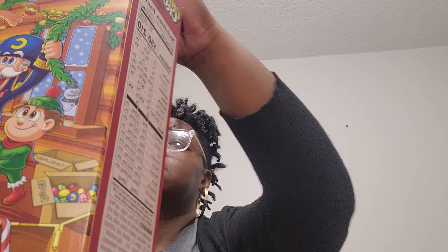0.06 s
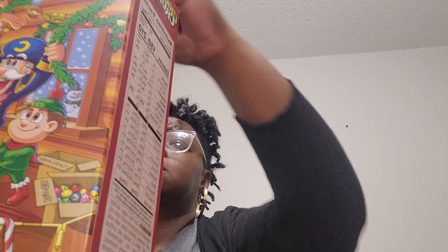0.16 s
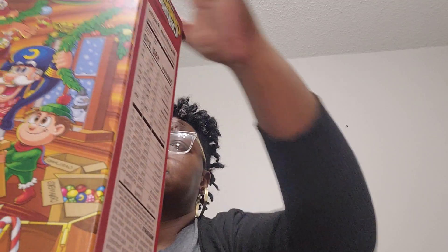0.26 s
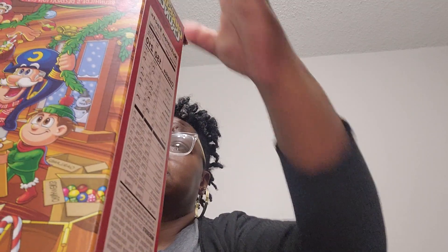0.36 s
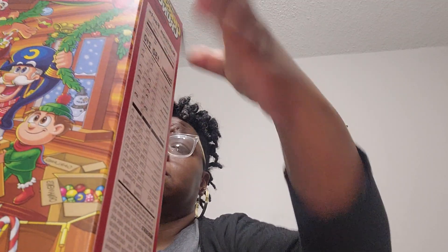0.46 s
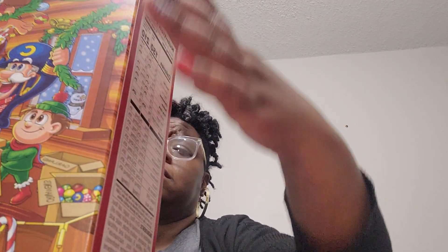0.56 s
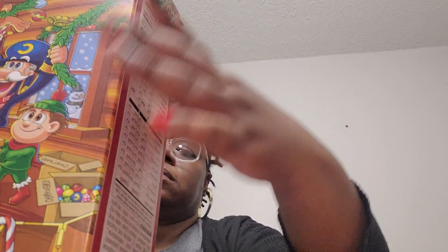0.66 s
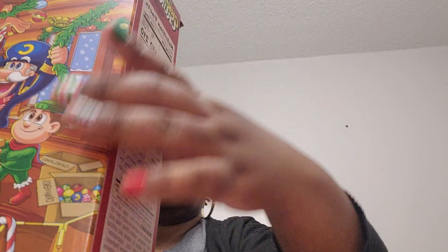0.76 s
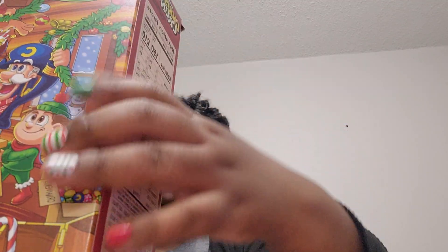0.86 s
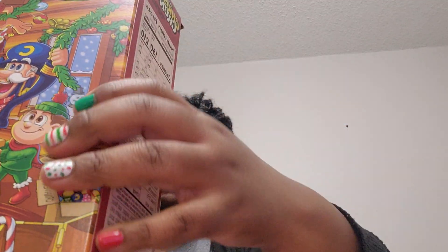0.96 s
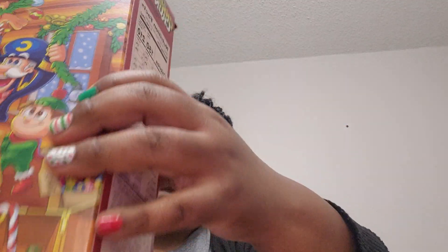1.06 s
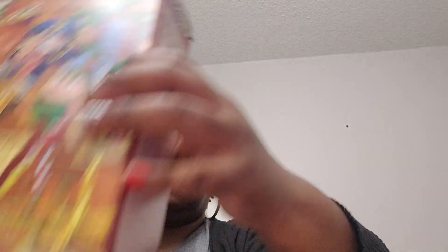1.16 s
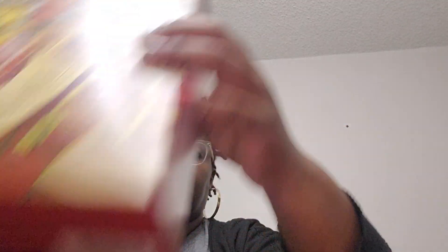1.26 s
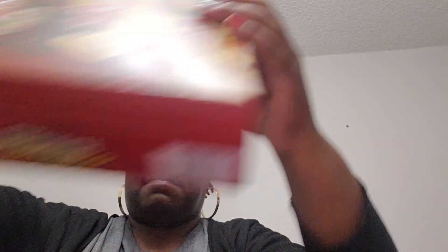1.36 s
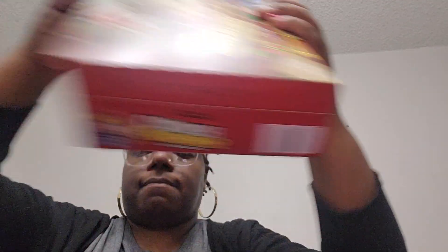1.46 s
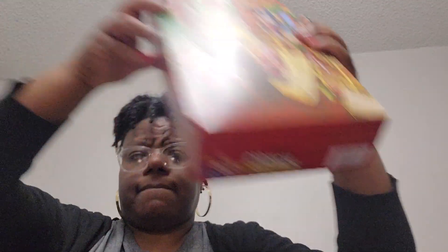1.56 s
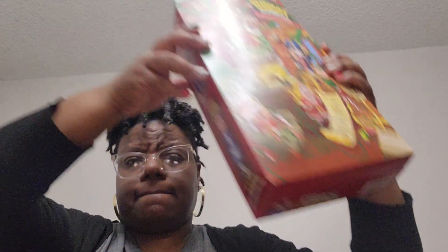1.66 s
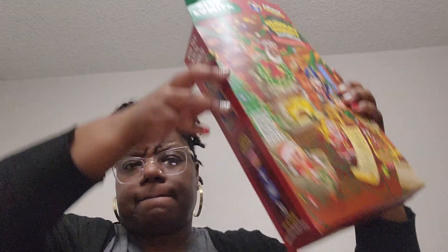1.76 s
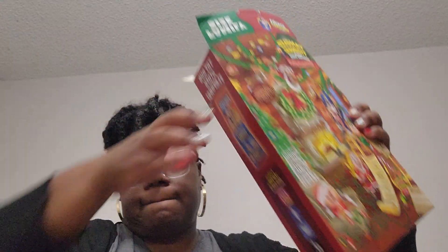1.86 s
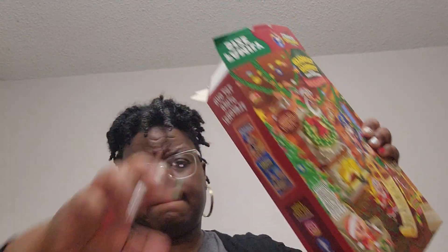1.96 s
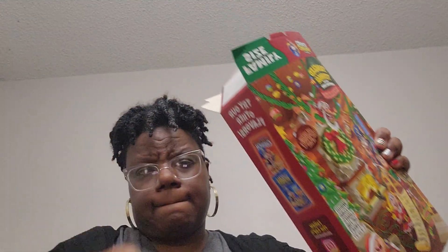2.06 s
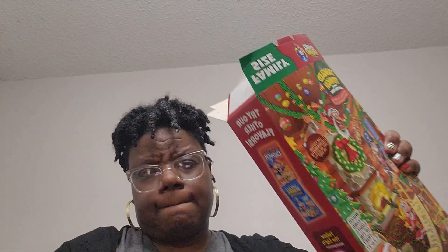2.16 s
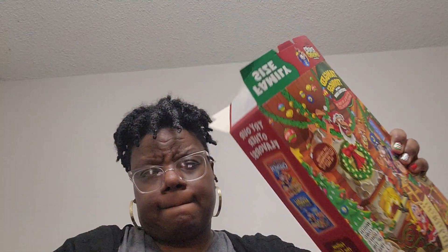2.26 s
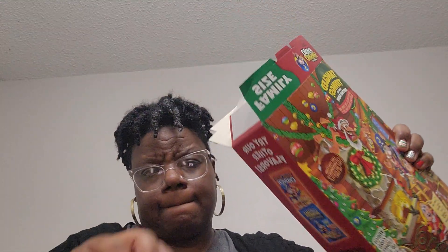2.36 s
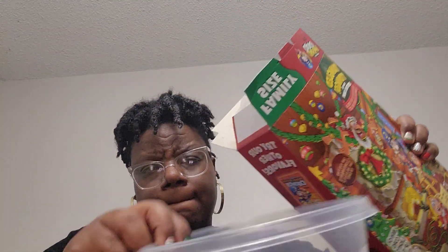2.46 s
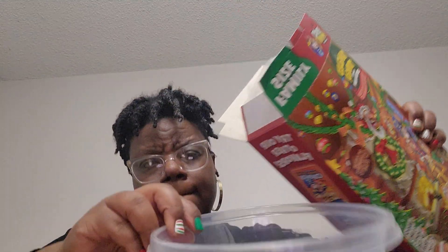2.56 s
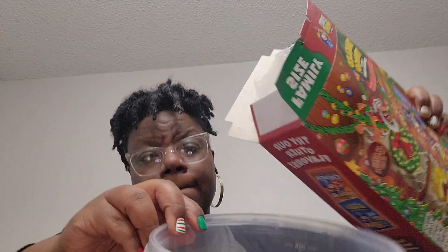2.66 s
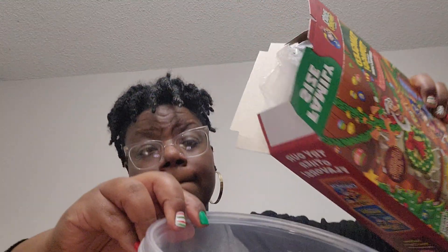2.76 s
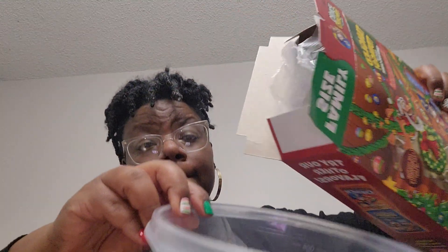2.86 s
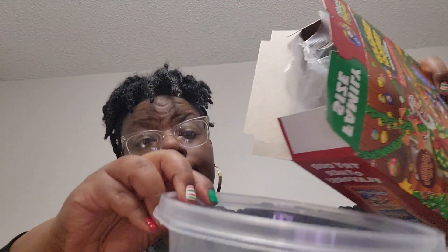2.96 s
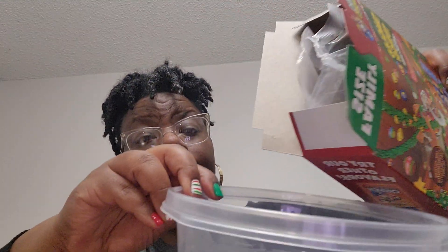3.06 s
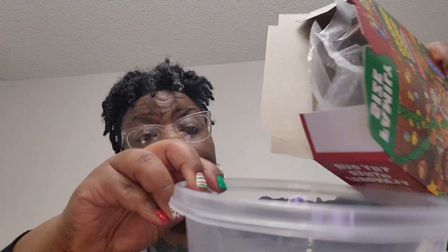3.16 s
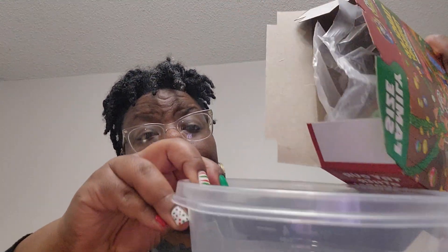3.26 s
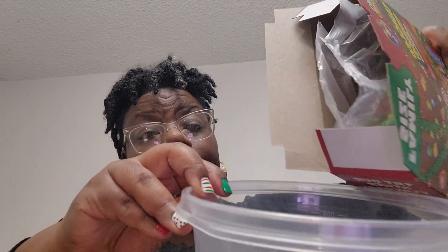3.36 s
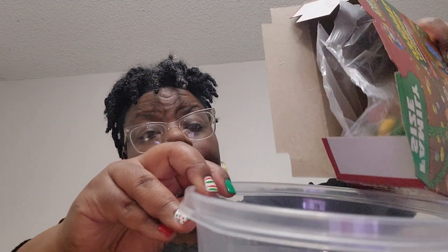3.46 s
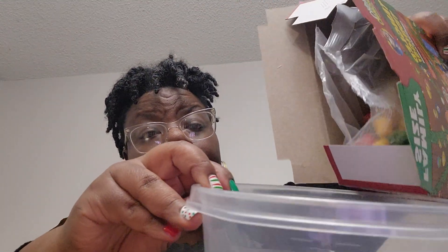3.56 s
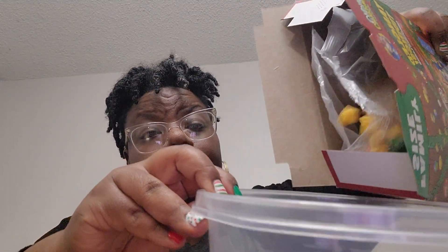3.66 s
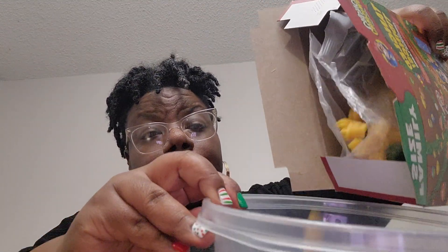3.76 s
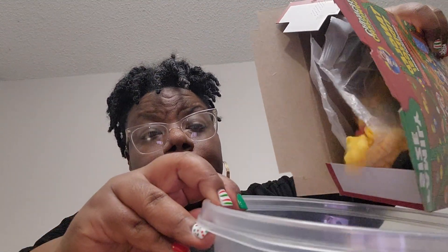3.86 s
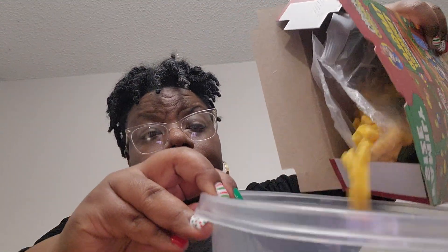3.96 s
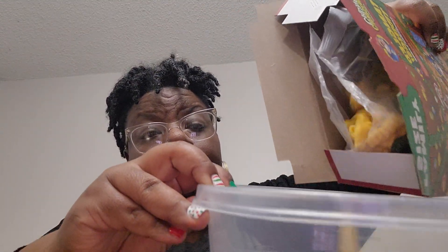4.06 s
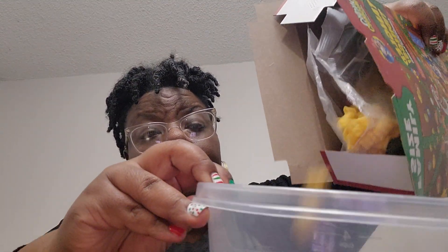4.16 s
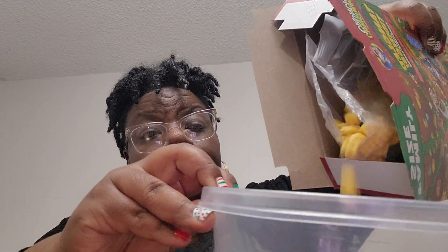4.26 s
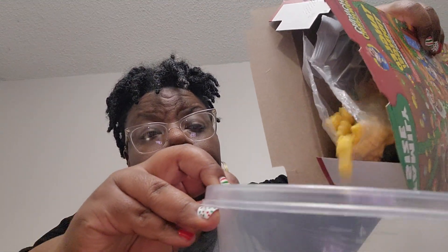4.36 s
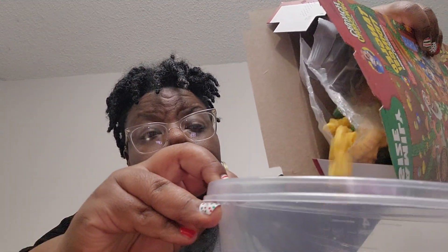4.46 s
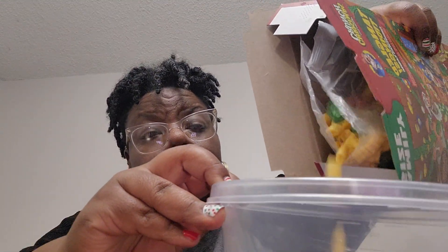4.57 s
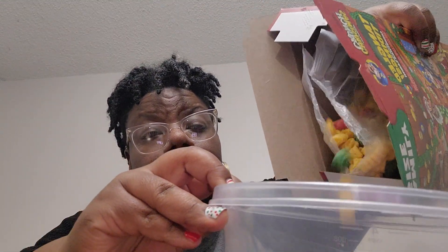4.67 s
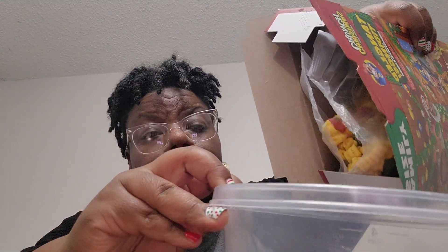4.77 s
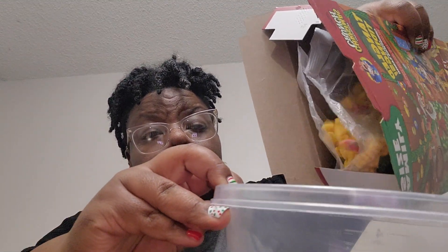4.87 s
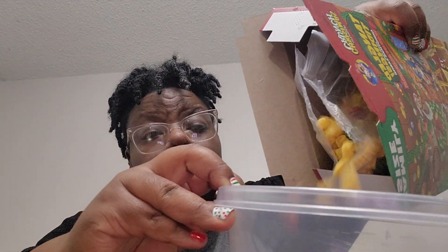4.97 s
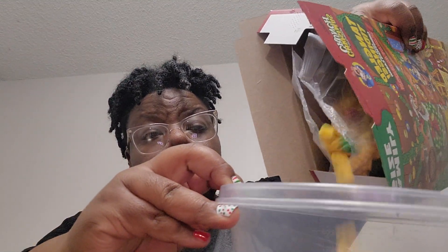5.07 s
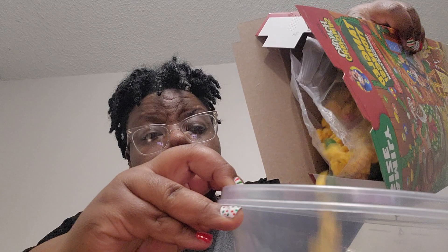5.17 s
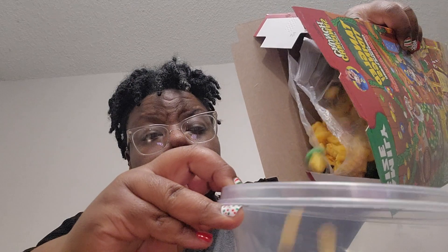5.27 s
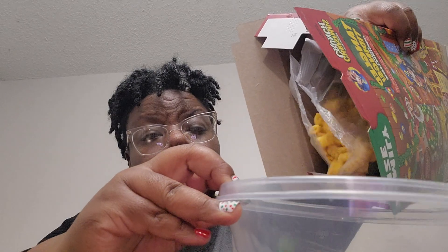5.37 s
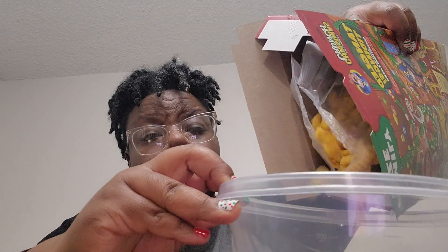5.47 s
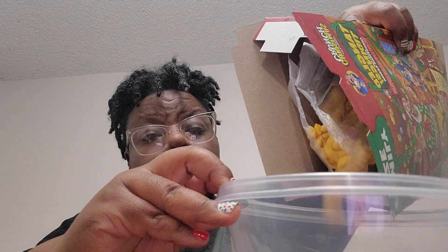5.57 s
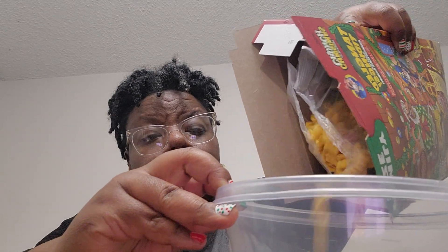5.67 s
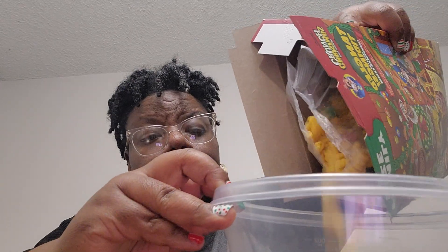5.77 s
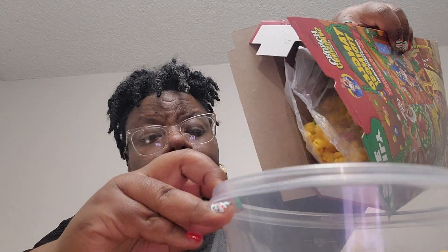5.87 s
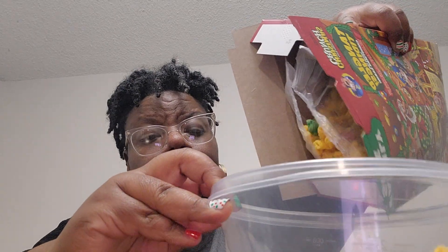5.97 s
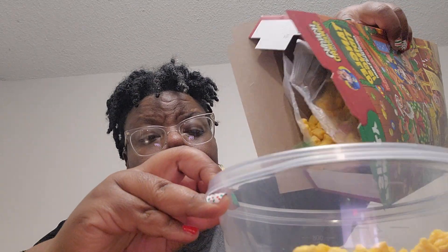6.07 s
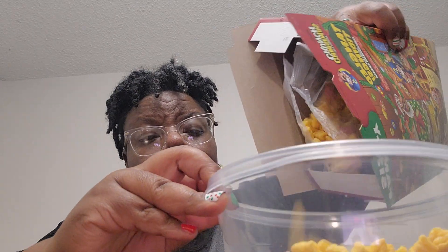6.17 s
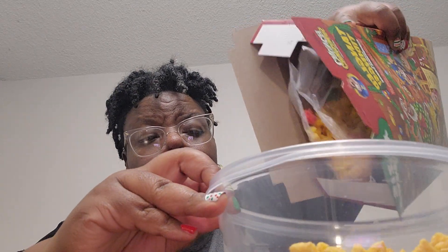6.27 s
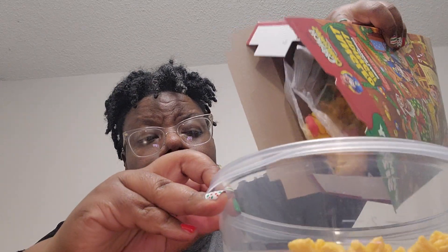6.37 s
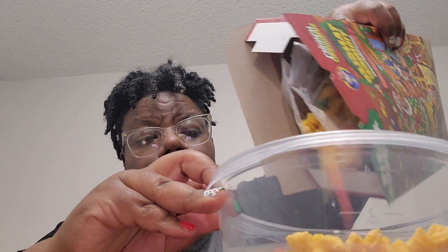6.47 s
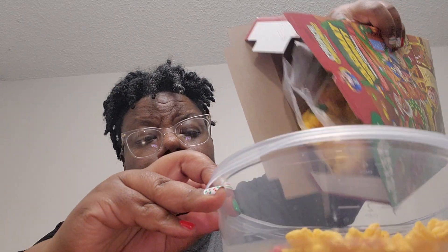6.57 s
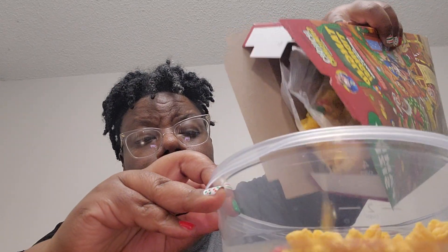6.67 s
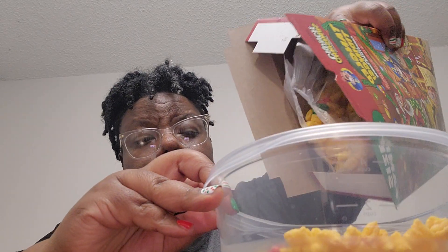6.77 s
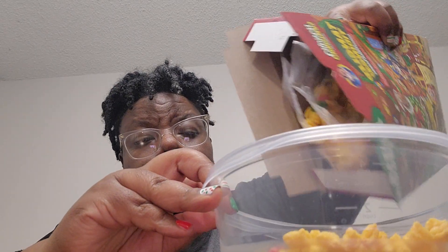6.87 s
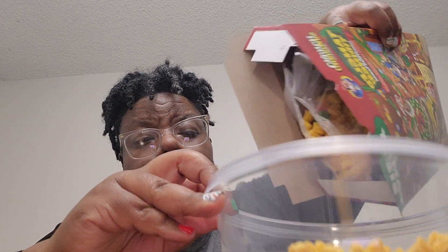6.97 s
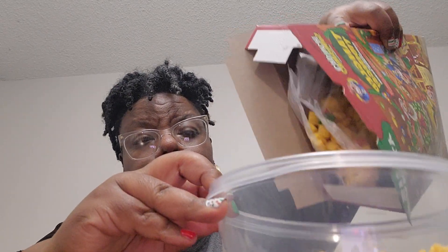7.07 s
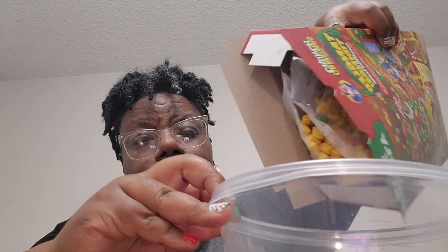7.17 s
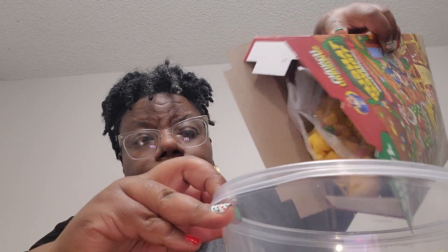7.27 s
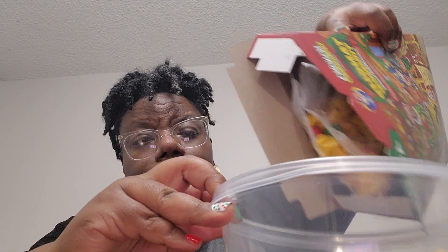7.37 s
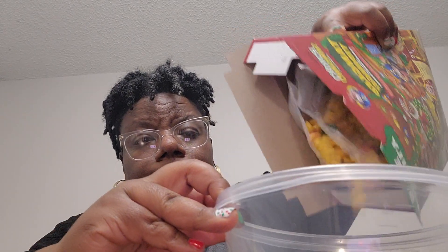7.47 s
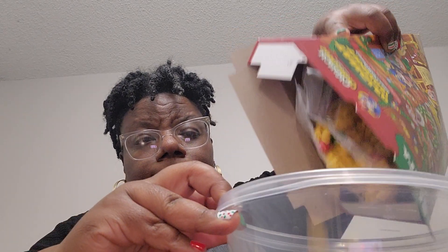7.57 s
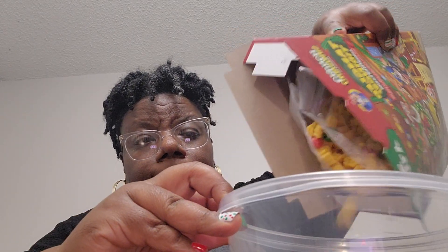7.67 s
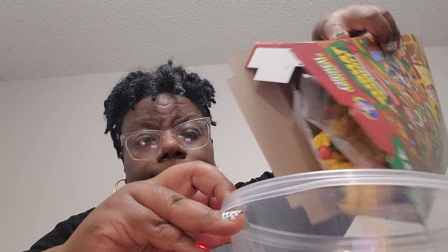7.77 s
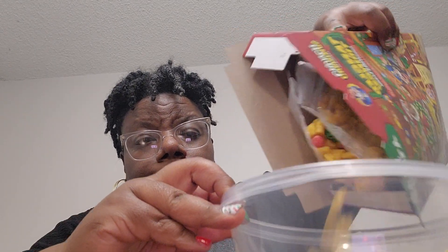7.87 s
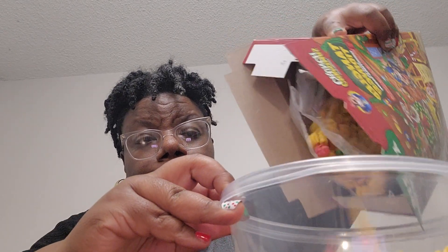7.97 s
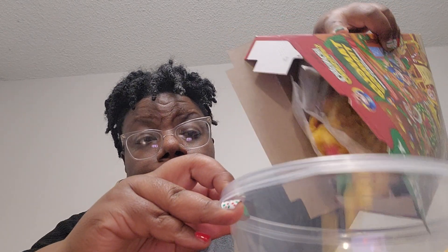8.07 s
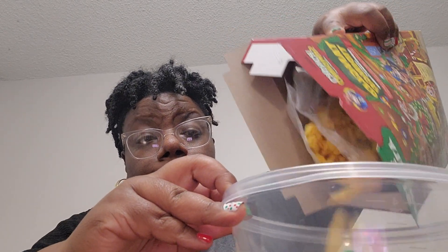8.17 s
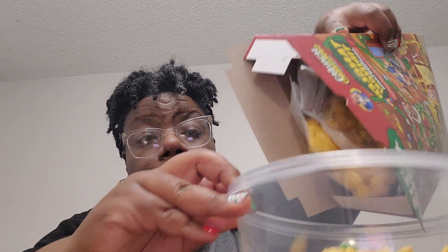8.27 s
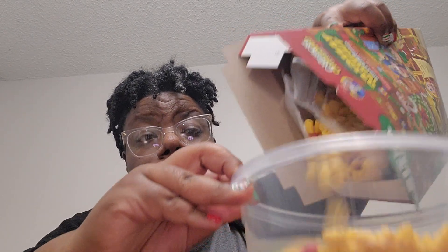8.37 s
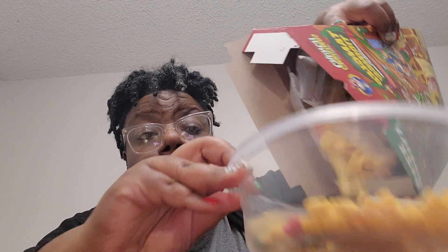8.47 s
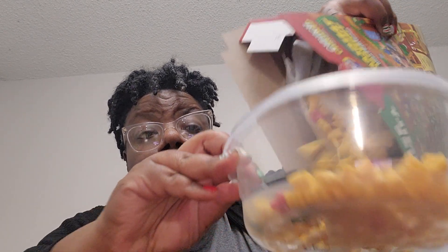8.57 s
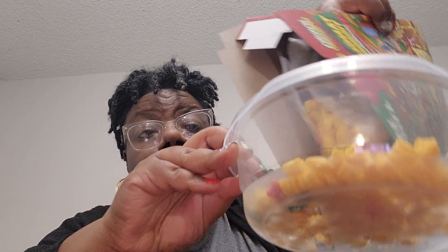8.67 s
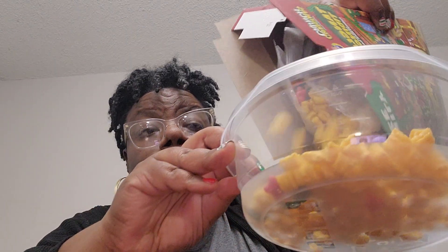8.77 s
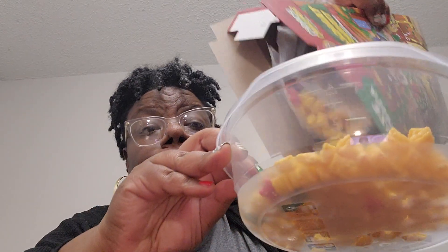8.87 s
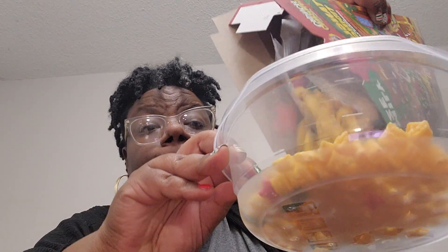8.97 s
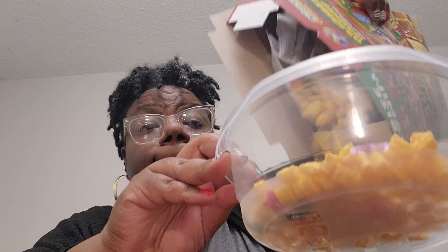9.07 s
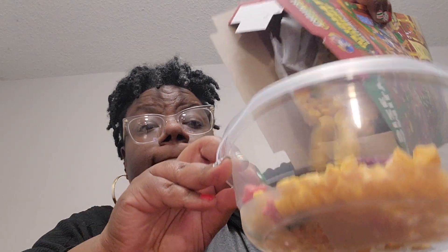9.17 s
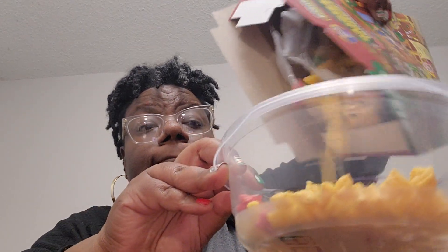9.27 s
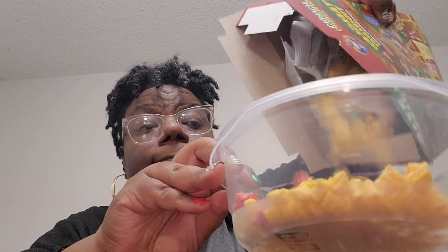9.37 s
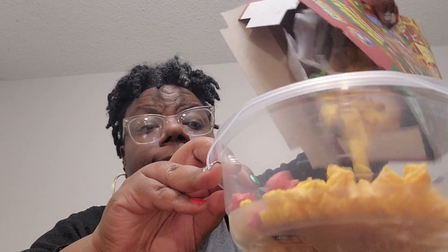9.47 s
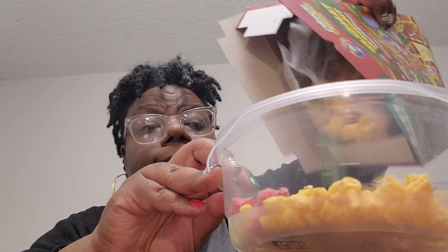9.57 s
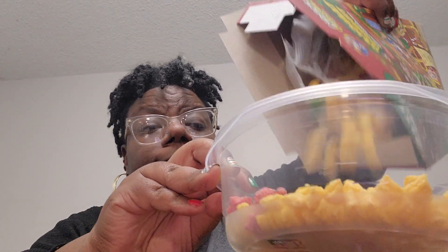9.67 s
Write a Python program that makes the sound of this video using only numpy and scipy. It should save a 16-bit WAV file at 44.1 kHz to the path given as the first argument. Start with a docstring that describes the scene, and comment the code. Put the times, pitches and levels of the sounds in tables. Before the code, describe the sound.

In a small quiet room, close to the microphone, hands rub and bump a cardboard cereal box while its plastic liner crinkles and cereal shifts inside. After about four seconds hard, light pieces rattle densely into a hollow plastic tub with sharp clacks and knocks. They thin to scattered hits with a couple of bright rim ticks, then a duller, softer stream tumbles onto the heap.

```python
"""A cardboard cereal box is picked up and tipped over a plastic tub in a small room. First hands bump and rub
the box (grainy noise and short rings) and its liner bag crinkles; then the cereal slides forward (soft noise).
From about 3.9 s hard pieces drop into the tub, each a knock, a clack and a crack with weaker repeats.
They thin out from about 6 s, and from about 7.6 s a duller stream runs on to the heap."""
import sys
import numpy as np
from scipy import signal
from scipy.fft import rfft, irfft, next_fast_len
from scipy.io import wavfile
from scipy.ndimage import map_coordinates

SR = 44100
rng = np.random.default_rng(int(sys.argv[2]) if len(sys.argv) > 2 else 0)


def wav_record(signal):
    """Record a signal, one row per channel, as 16-bit PCM in the file named by sys.argv[1]."""
    frames = np.transpose(np.atleast_2d(signal))
    bounded = np.clip(frames, -1, 1)
    # unit amplitude maps onto the largest positive 16-bit level
    quanta = np.round(bounded * 32767).astype(np.int16)
    wavfile.write(sys.argv[1], SR, quanta)


N = 428034

# Pieces landing in the tub. Each row: start in seconds, then relative levels of the knock of the tub,
# the clack of the piece and the crack of its crust, all in dB.
PIECES = [(3.9263, -22, -15, -22), (3.9348, -42, -27, -23.5), (4.002, -41, -26.5, -32),
          (4.023, -19, -15.5, -19.5), (4.0426, -37, -30, -35), (4.0498, -42, -35, -32),
          (4.078, -15.5, -11.5, -26), (4.0934, -42, -27, -29.5), (4.149, -24.5, -15.5, -18.5),
          (4.1579, -28, -21, -18), (4.1666, -25.5, -24, -34), (4.1768, -48, -24, -27),
          (4.2, -16.5, -13, -22.5), (4.226, -29, -13, -21), (4.2653, -51, -13, -33),
          (4.2699, -48, -14.5, -22), (4.3081, -26.5, -13, -29), (4.3472, -26.5, -20.5, -24),
          (4.4031, -28.5, -20, -21), (4.4204, -40, -38, -31), (4.4438, -27, -21, -27),
          (4.4575, -18.5, -20.5, -27.5), (4.487, -21, -24, -22.5), (4.5723, -22.5, -20.5, -29),
          (4.6065, -21.5, -21.5, -23.5), (4.6663, -18.5, -15, -22.5), (4.677, -26, -20.5, -21.5),
          (4.7093, -27, -42, -29), (4.7233, -25.5, -24, -30), (4.7679, -31.5, -31, -39),
          (4.7812, -29, -30, -37), (4.813, -29, -30, -33.5), (4.8485, -22, -20, -25.5),
          (4.868, -19, -25, -21.5), (4.88, -40, -23, -35), (4.898, -18, -21, -30.5), (4.952, -32, -42, -40),
          (5.1398, -24.5, -19.5, -20.5), (5.1496, -23.5, -30, -21.5), (5.1868, -24, -23, -22.5),
          (5.2107, -36, -27, -25), (5.255, -24, -20.5, -27.5), (5.303, -30, -28, -35),
          (5.3202, -20.5, -16.5, -21), (5.372, -30, -26, -25), (5.4112, -24.5, -34, -37),
          (5.4241, -26.5, -26, -25), (5.473, -32.5, -29, -36.5), (5.5057, -19.5, -23, -30.5),
          (5.5846, -25.5, -28.5, -21), (5.666, -22.5, -26, -24.5), (5.74, -18.5, -19, -22),
          (5.8152, -23, -21.5, -22), (5.908, -29.5, -25.5, -30.5), (5.9254, -20, -19, -18.5),
          (5.944, -22.5, -23.5, -31), (5.9507, -24, -31, -29), (5.9662, -22, -25, -28.5),
          (6.0556, -27.5, -36, -34.5), (6.2821, -22.5, -23, -23.5), (6.2901, -24.5, -25, -38),
          (6.318, -24, -31, -23), (6.4633, -19, -20, -20.5), (6.5348, -37.5, -41, -53),
          (6.627, -21, -30, -40), (6.647, -23.5, -23.5, -24), (6.6598, -27, -22, -30),
          (6.8077, -31.5, -26, -37), (6.8306, -44, -24.5, -25.5), (6.8353, -33, -32, -33),
          (7.1263, -28, -23, -24.5), (7.1995, -38.5, -37.5, -45), (7.357, -41, -43, -42),
          (7.4886, -31, -37.5, -41), (7.6893, -30, -25.5, -31), (7.7115, -15, -17.5, -21),
          (7.7535, -31, -36, -40), (7.7679, -19.5, -33, -46), (7.8023, -47, -23, -19.5),
          (7.888, -34, -33.5, -31), (7.9226, -31, -31, -33), (7.9473, -28, -37, -34),
          (8.0066, -24.5, -22.5, -25), (8.1944, -33, -28, -34), (8.2118, -30.5, -31, -37),
          (8.2485, -46, -26, -31.5), (8.3028, -30, -23.5, -32.5), (8.3864, -23, -23, -24),
          (8.5322, -29, -28, -25.5), (8.5594, -32, -26, -37), (8.6558, -30, -24, -30.5),
          (8.7053, -26, -23.5, -36), (8.733, -21, -22, -29.5), (8.7432, -27, -26, -35),
          (8.8164, -36, -25.5, -56), (8.841, -23.5, -28, -48), (8.8628, -23.5, -35, -51),
          (8.931, -35, -30, -31.5), (8.9405, -36, -38, -28.5), (9.047, -27.5, -36, -42),
          (9.1046, -29, -39, -45), (9.1335, -23, -29.5, -44), (9.1565, -30, -32, -45),
          (9.2681, -28.5, -29.5, -43), (9.3674, -32.5, -32.5, -42), (9.415, -30, -29, -52),
          (9.4636, -19, -27, -30), (9.4756, -35, -31, -45), (9.522, -25, -32, -43), (9.542, -23, -32, -37),
          (9.56, -26, -28.5, -33.5), (9.6476, -23, -23.5, -31.5)]
# How pitch and stirring of the landings change over time. Each row: time in seconds, tub pitch in Hz,
# typical piece pitch in Hz, stirring of the heap relative to the landing in dB.
LANDING_CHANGES = [(3.9, 890, 2130, -17), (4.226, 880, 2160, -30), (4.265, 877, 2420, -33),
                   (4.5, 867, 2192, -19.5), (6.3, 833, 2077, -5), (6.7, 746, 1538, -5.5),
                   (8.3, 757, 1944, -6.5), (9.598, 742, 1580, -7)]
# Colour of the liner bag. Each row: frequency in Hz, relative level in dB.
LINER = [(1200, -22), (2300, 8), (2800, -3), (3400, 3.5), (5200, 6.5), (5850, 9), (6400, -3), (7700, 4),
         (8300, -7), (12000, -6.5), (16000, -8)]
# How alike left and right are. Each row: frequency in Hz, likeness from 0 to 1.
ALIKE = [(130, 0.99), (650, 0.86), (3100, 0.049), (6800, 0.11), (15000, 0)]
RING_S = np.arange(SR // 50) / SR  # time axis of one blow: every blow is cut off after 20 ms


def amp(db):
    """Turn decibels into gain."""
    return 10 ** (np.asarray(db) / 20)


def unit(x):
    """Scale to an average (rms) level of 1."""
    return x / np.sqrt(np.mean(x ** 2) + 1e-20)


def along(points, hz):
    """Read a curve of (Hz, value) points on a log frequency axis."""
    f, v = np.transpose(points)
    return np.interp(np.log(hz + 1), np.log(f + 1), v)


def gains(rows):
    """Give a gain per sample for each dB column, fading out beyond the first and last row."""
    s, *columns = np.transpose(rows)
    t = np.arange(N) / SR
    fade = np.clip(1 + np.minimum(t - s[0], s[-1] - t) / 0.0063, 0, 1)
    return [fade * amp(np.interp(t, s, column)) for column in columns]


def wobble(rate):
    """Draw a smooth random curve through `rate` random points a second."""
    knots = rng.standard_normal(int(N * rate / SR) + 4)
    return map_coordinates(knots, [np.arange(N) * rate / SR])


def swells(rows, rise, t60):
    """Rise, hold and release for each (start, length, dB, ..) row; give a gain per sample per dB column."""
    t = np.arange(0, N / SR, .001)
    start, length, *levels = np.transpose(rows)[..., None]
    rising = np.clip((t - start) / (rise * length), 0, 1)  # rise: share of the length spent growing
    release = amp(-60 * np.maximum(t - start - length, 0) / t60)
    shape = rising * release
    samples = np.arange(N) / SR
    return [np.interp(samples, t, np.linalg.norm(amp(db) * shape, axis=0)) for db in levels]


def colour(pair, spectrum):
    """Filter two unrelated signals to a spectrum, never sounding early, and mix them to a stereo likeness."""
    n = pair.shape[-1]
    size = 2 * next_fast_len(n // 2 + 1024)
    hz = np.fft.rfftfreq(size, 1 / SR)
    # folding the cepstrum forward in time gives a minimum-phase filter
    cepstrum = irfft(np.log(amp(along(spectrum, hz)) + 1e-6))
    cepstrum[1:size // 2] *= 2
    cepstrum[size // 2 + 1:] = 0
    response = np.exp(rfft(cepstrum))
    turn = np.arccos(np.clip(along(ALIKE, hz), -1, 1)) / 2
    z = irfft(rfft(pair, size) * response * [np.cos(turn), np.sin(turn)])[..., :n]
    mid, side = z[..., 0, :], z[..., 1, :]
    return np.stack([mid + side, mid - side], axis=-2)


def mottle(x, depth_db):
    """Let each fold or contact favour its own few resonances: random patches in time and frequency."""
    patch_s, patch_hz = .016, 463
    hz, t, z = signal.stft(x, SR, nperseg=256)
    knots = rng.standard_normal((int(hz[-1] / patch_hz) + 3, int(t[-1] / patch_s) + 3))
    places = np.meshgrid(hz / patch_hz, t / patch_s, indexing="ij")
    patches = np.clip(unit(map_coordinates(knots, places, order=1)), -2, 2)
    return signal.istft(z * amp(depth_db * patches), SR, nperseg=256)[1][:, :N]


def grains(spectrum, rate, spread_db, life, smooth, patchy_db):
    """Add up tiny contacts of random size, each a short puff of noise, over smooth friction; rms 1."""
    happens = rng.random(N) < rate / SR  # rate: contacts a second
    sizes = amp(spread_db * np.clip(rng.standard_normal(N), -2, 2)) * happens
    power = signal.lfilter([1], [1, -np.exp(-2 / (life * SR))], sizes ** 2)  # life: fading time in seconds
    puffs = rng.standard_normal((2, N)) * np.sqrt(power / power.mean() + smooth)
    return unit(colour(mottle(puffs, patchy_db), spectrum))


def rings(pitch, modes, scatter, attack, apart):
    """Ring once in stereo per blow; every spot that is struck weights and tunes the modes anew."""
    out = 0
    for multiple, db, t60 in modes:
        tune, size, phase, lag = rng.standard_normal((len(pitch), 4)).T[..., None, None]
        hz = pitch[:, None, None] * multiple * np.exp(scatter * tune)
        offset = apart * lag * np.array([[1], [-1]])  # opposite phase shifts left and right
        angle = 2 * np.pi * hz * RING_S + phase / 2 + offset
        strength = amp(db + 3 * size)
        out = out + strength * amp(-60 * RING_S / t60) * np.sin(angle.astype(np.float32))
    return out * (1 - np.exp(-RING_S / attack))


def cracks(count, spectrum, t60, spike):
    """Make a sharp first contact and a short burst of noise, in stereo, per blow."""
    burst = rng.standard_normal((count, 2, len(RING_S))) * amp(-60 * RING_S / t60)
    onset = round(SR * .0004)
    burst[:, 0, onset] += spike
    burst[:, 1, onset + 1] += spike * rng.standard_normal(count)
    return colour(burst, spectrum)


def place(times, levels_db, shapes):
    """Lay each shape at its time, with its first 4 ms at the given rms level."""
    first = round(.004 * SR)
    out = np.zeros((2, N + SR))
    for s, db, shape in zip(times, levels_db, shapes):
        spot = out[:, round(s * SR):][:, :len(RING_S)]
        spot += amp(db) * shape / np.std(shape[:, :first])
    return out[:, :N]


def box():
    """Cardboard rubs and is bumped; the cereal shifts and the bag inside crackles."""
    # Hands slide on the box and flex the bag in it. Each row: start in seconds, length in seconds,
    # relative level of the cardboard rub in dB, relative level of the liner bag in dB.
    strokes = [(-.03, 0.11, -51, -56), (.12, 0.16, -44, -48.5), (.42, 0.15, -50, -54),
               (.56, 0.084, -52, -54.5), (.88, 0.13, -77, -57.5), (.97, 0.22, -40.5, -57.5),
               (1.52, 0.18, -49.5, -62), (1.72, 0.18, -44.5, -65.5), (2.11, 0.022, -46.5, -62),
               (2.28, 0.079, -70, -58.5), (2.51, 0.34, -42, -62), (2.72, 0.059, -43, -48),
               (2.79, 0.16, -48, -52.5), (2.9, 0.18, -37.5, -49), (3.04, 0.39, -45, -52.5),
               (3.63, 0.064, -42, -53), (3.73, 0.18, -42.5, -45.5), (7.3, 0.21, -47.5, -53.5)]
    # Cereal shifts inside as the box is turned. Each row: start in seconds, length in seconds, level in dB.
    shifts = [(1.02, 0.26, -58.5), (1.45, 0.38, -61), (1.8, 0.094, -49.5), (1.93, 0.11, -58.5),
              (2.205, 0.013, -47), (2.29, 0.056, -53.5)]
    # Bumps of fingers and box. Each row: start in seconds, level in dB, pitch in Hz.
    bump_rows = [(.57, -37, 770), (0.578, -31.5, 203), (1.094, -34.5, 578), (1.209, -35.5, 470),
                 (1.261, -37, 248), (1.802, -41, 800), (2.335, -47, 590), (3.312, -25.5, 715),
                 (3.317, -35, 415), (3.352, -30.5, 720), (3.852, -31, 412)]
    # How the card rings when bumped. Each row: multiple of bump pitch, relative level in dB,
    # time to fade by 60 dB in seconds.
    flap = [(.6, 10, 0.0067), (1, 3.5, 0.022), (1.452, 1, 0.022), (2, -8, 0.02)]
    # The bag snaps. Each row: start in seconds, level in dB.
    crease_rows = [(0.137, -48), (0.438, -47.5), (0.501, -46), (2.763, -41), (3.052, -41), (3.271, -35),
                   (3.427, -37), (3.51, -39.5), (3.615, -40), (3.681, -36), (3.8507, -43)]
    # Colours of rubbed cardboard, of cereal heard through it, of a fold of the bag flipping over and
    # of a nail meeting the card. Each row: frequency in Hz, relative level in dB.
    cardboard = [(60, -4), (140, 0), (380, -1.5), (900, 0), (1700, -13.5), (2300, -10), (4000, -45)]
    muffled = [(600, -14), (1300, 8), (2200, 8), (3000, -1.5), (4400, 2), (9000, -26)]
    crinkle = [(1000, 3.5), (2400, -0.5), (5600, 1), (9000, -8), (16000, -12)]
    tap = [(300, 6), (1200, 7), (2500, -3), (5500, -4), (12000, -25)]

    judder = amp(0.6 * wobble(39))  # the grip sticks and slips
    rub_gain, bag_gain = swells(strokes, rise=0.4, t60=0.27) * judder
    rub = rub_gain * grains(cardboard, rate=600, spread_db=6.5, life=0.0073, smooth=0.21, patchy_db=3.0)
    # the empty tub is pulled up and colours the rubbing
    tub_arrives_s, tub_hz, tub_q, tub_db = 1.9, 704, 12, 7
    tub_tone = signal.lfilter(*signal.iirpeak(tub_hz, tub_q, fs=SR), rub)
    rub = rub + amp(tub_db) * tub_tone * (np.arange(N) / SR > tub_arrives_s)

    bag = bag_gain * grains(LINER, rate=400, spread_db=3.5, life=0.0016, smooth=0.65, patchy_db=3.5)
    crackle = bag_gain * grains(crinkle, rate=70, spread_db=7, life=0.0011, smooth=0, patchy_db=3)
    shift_gain = swells(shifts, rise=0.023, t60=0.084)[0]
    shift = shift_gain * grains(muffled, rate=450, spread_db=11.5, life=0.0033, smooth=0.2, patchy_db=4.0)

    s, db, hz = np.transpose(bump_rows)
    bumps = place(s, db, rings(hz, flap, scatter=0.059, attack=0.0021, apart=0.18))
    taps = place(s, db - 8, cracks(len(s), tap, t60=0.025, spike=0.58))
    s, db = np.transpose(crease_rows)
    creases = place(s, db, cracks(len(s), crinkle, t60=0.029, spike=1.6))
    return amp(-4.5) * rub + amp(-2.3) * bag + amp(-6) * crackle + shift + bumps + taps + creases


def room(x, delay, count=24):
    """The walls answer with fading noise, drawn anew for each stretch of time as box and tub move."""
    # How long the echo lasts. Each row: frequency in Hz, time to fade by 60 dB in seconds.
    echo_times = [(800, 0.17), (8000, 0.22), (15000, 0.19)]
    out = np.zeros((2, N + SR))
    step = N // count + 1
    for start in range(0, N, step):
        hz, t, z = signal.stft(rng.standard_normal((2, SR // 3)), SR, nperseg=256)
        turn = np.arccos(np.clip(along(ALIKE, hz), -1, 1))[:, None] / 2
        fading = amp(-60 * t / along(echo_times, hz)[:, None])
        z = z * fading * np.array([np.cos(turn), np.sin(turn)])
        mid, side = signal.istft(z, SR, nperseg=256)[1]
        fade_in = np.clip(np.arange(len(mid)) / (delay * SR) - 1, 0, 1)
        tail = np.array([mid + side, mid - side]) * fade_in
        wet = signal.fftconvolve(x[:, start:start + step], tail / np.linalg.norm(tail[0]), axes=1)
        out[:, start:start + wet.shape[1]] += wet
    return out[:, :N]


def palm():
    """Skin sliding off glossy card gives a smooth, bright swish of noise."""
    # Each row: start in seconds, length in seconds, level in dB.
    swishes = [(.14, 0.062, -52)]
    # Colour of the swish. Each row: frequency in Hz, relative level in dB.
    gloss = [(3000, -24), (6000, 12), (12000, 34), (16000, 20)]
    return swells(swishes, rise=0.89, t60=.17)[0] * unit(colour(rng.standard_normal((2, N)), gloss))


def table():
    """The table top booms briefly under box and tub: a few fading low tones."""
    # Box and tub are nudged against the table. Each row: start in seconds, relative level in dB, pitch in Hz.
    thuds = [(0.574, -33, 134.8), (2.334, -42, 204)]
    # Each row: multiple of thud pitch, relative level in dB, time to fade by 60 dB in seconds.
    boom_modes = [(.43, -7, 0.17), (1, -1.5, 0.34), (2.63, -13, 0.5)]
    out = np.zeros(N)
    for s, level_db, hz in thuds:
        t = np.maximum(np.arange(N) / SR - s, 0)
        boom = 0
        for multiple, db, t60 in boom_modes:
            boom = boom + amp(level_db + db - 60 * t / t60) * np.sin(2 * np.pi * hz * multiple * t)
        out += boom * (1 - np.exp(-t / 0.002))
    return out


def tumbling(rate=84):
    """Cereal slides down box and liner, the stream brings small uneven landings, the heap jostles finely."""
    # Cereal sliding down the tilted box. Each row: time in seconds, relative level in dB.
    slide_rows = [(2.3, -50.5), (2.52, -81), (2.75, -45.5), (3.3, -49), (3.52, -54.5), (3.7, -47),
                  (4.3, -46.5), (7.1, -52.5), (8.75, -52), (9.7, -60)]
    # Colours of the heap and of the inside of the box. Each row: frequency in Hz, relative level in dB.
    heap_colour = [(150, -15), (290, -10.5), (470, -16.5), (660, 6), (740, -0.5), (1160, -1), (1480, 1.5),
                   (1720, -13), (2080, 0), (2690, -19), (3700, -12), (4400, -18.5), (5600, -17.5),
                   (8200, -37), (16000, -36)]
    hollow_colour = [(50, -23), (90, 3.5), (135, 6.5), (200, -1.5), (350, -8), (600, -32.5)]

    stream, moving = flow()
    when, _, piece_hz, _ = np.transpose(LANDING_CHANGES)
    beats = np.arange(when[0], N / SR - 3 / rate, 1 / rate)  # `rate` landings a second
    late, tune, size, *own = rng.uniform(-1, 1, (len(beats), 6)).T
    s = beats + 2 * late / rate  # uneven moments
    stream_db = 20 * np.log10(stream[np.round(s * SR).astype(int)] + 1e-6)
    db = stream_db + 3 * size + 4 * np.array(own)
    hz = np.interp(s, when, piece_hz) * np.exp(0.302 * tune)
    small_landings = blows(s, db[0] - .8, db[1] - .6, db[2] - 9.5, hz)

    sliding, = gains(slide_rows)
    jostling = np.hypot(moving, amp(-1.0) * sliding)
    heap = jostling * grains(heap_colour, rate=230, spread_db=5.0, life=0.002, smooth=0.03, patchy_db=4.5)
    hollow = unit(colour(rng.standard_normal((2, N)), hollow_colour))
    liner = unit(colour(rng.standard_normal((2, N)), LINER))
    slide = sliding * (amp(-5.5) * hollow + amp(-13) * liner)
    return small_landings + amp(-1.06) * heap + slide


def landings():
    """The loudest pieces and their echoes; pieces differ in size, and so in pitch."""
    s, *levels = np.transpose(PIECES)
    when, _, piece_hz, _ = np.transpose(LANDING_CHANGES)
    hz = np.interp(s, when, piece_hz) * np.exp(0.035 * rng.standard_normal(len(s)))
    return blows(s, *levels, hz) + echoes(hz)


def blows(s, knock_db, clack_db, crack_db, piece_hz):
    """Each piece knocks the plastic floor, rings briefly itself and cracks at the point of contact."""
    # Ringing tones of the tub. Each row: multiple of tub pitch, relative level in dB,
    # time to fade by 60 dB in seconds.
    tub_modes = [(0.802, -13, 0.093), (0.998, 8.5, 0.023), (1.17, 6.5, .016)]
    # Main and upper ring of a piece. Each row: multiple of piece pitch, relative level in dB,
    # time to fade by 60 dB in seconds.
    puff_modes = [(0.723, -10.5, 0.012), (0.999, 5.5, 0.0067), (1.402, -6.5, .007)]
    shell_modes = [(1.678, -9, 0.03), (2.3, -9, 0.0085), (3.1, -15.5, .012)]
    # Colour of the crack. Each row: frequency in Hz, relative level in dB.
    crust = [(1200, -18.5), (2400, -6.5), (3400, -4.5), (5200, -8), (7000, -16.5), (8500, -19.5),
             (12000, -23.5), (16000, -29)]

    when, tub_hz, _, _ = np.transpose(LANDING_CHANGES)
    knock = rings(np.interp(s, when, tub_hz), tub_modes, scatter=0.078, attack=0.00037, apart=0.2)
    clack = rings(piece_hz, puff_modes, scatter=0.015, attack=0.0016, apart=0.28)
    shell = rings(piece_hz, shell_modes, scatter=0.0764, attack=0.000067, apart=1.0)
    crack = off_wall(cracks(len(s), crust, t60=0.011, spike=4.0))
    hits = (place(s, knock_db - .8, knock) + place(s, clack_db - .8, clack)
            + place(s, crack_db - 1.0, crack) + place(s, crack_db - 7, shell))
    # a thin floor radiates little bass
    return signal.sosfilt(signal.butter(2, 240, "high", fs=SR, output="sos"), hits)


def off_wall(shapes):
    """Add the echo of the tub's side; its delay depends on where the piece falls."""
    mean_delay_s, strength = .0011, 0.47
    lag = np.round(mean_delay_s * SR * (.5 + rng.random((len(shapes), 1, 1)))).astype(int)
    earlier = np.arange(len(RING_S)) - lag
    echo = (earlier >= 0) * np.take_along_axis(shapes, np.maximum(earlier, 0), axis=-1)
    return shapes + strength * echo


def echoes(hz, count=2):
    """Each hit has a faint soft onset up to a few ms before it and weaker repeats about 8 ms apart."""
    echo_gap_s, gap_shrink, gap_scatter = 0.0081, 0.87, 0.3
    echo_db, echo_loss_db = -14, 4.5
    onset_lead_s, onset_db = 0.003, -14.5
    s, *levels = np.transpose(PIECES)
    chance = rng.standard_normal((len(s), count + 1, 5)).T
    out, delay = 0, 0
    for k in range(count + 1):
        timing, tune, *size = chance[:, k]
        if k < count:
            delay = delay + echo_gap_s * gap_shrink ** k * np.exp(gap_scatter * timing)
            offset, change_db = delay, echo_db - echo_loss_db * k
        else:  # the last turn is the soft onset
            offset, change_db = -onset_lead_s * abs(timing), onset_db
        db = np.array(levels) + change_db + np.array(size)
        out = out + blows(s + offset, db[0], db[1], db[2] + 5, hz * np.exp(0.073 * tune))
    return out


def tub_wall(x, t60):
    """Narrow resonances of the plastic wall, set ringing by the blows in x."""
    # Each row: frequency in Hz, relative level in dB.
    wall_modes = [(728, -14.5), (1043, -10), (1310, -11.5), (1555, -11), (2320, -17.5), (3090, -18.5)]
    t = np.arange(SR // 5) / SR
    decay = amp(-60 * t / t60)
    tones = sum(amp(db) * np.cos(2 * np.pi * hz * t) for hz, db in wall_modes)
    ring = tones * decay / np.linalg.norm(decay)
    return signal.fftconvolve(x, ring[None] * amp(-10.5), axes=1)[:, :N]


def flow():
    """Give the gain of the stream from the bag, and of that stream plus what landings stir up in the heap."""
    # The cereal leaves the bag in gushes. Each row: start in seconds, length in seconds, relative level in dB.
    gushes = [(3.95, 0.96, -43), (5.145, 0.22, -34.5), (5.48, 0.54, -41.5), (7.66, 0.13, -33),
              (7.92, 0.15, -30), (8.2, 0.26, -33), (8.47, 0.36, -32.5), (8.925, 0.019, -33),
              (9.04, 0.28, -39.5), (9.4, 0.032, -37), (9.54, 0.33, -35)]
    s, knock_db, clack_db, _ = np.transpose(PIECES)
    when, _, _, stir_db = np.transpose(LANDING_CHANGES)
    kicks = np.hypot(amp(knock_db), amp(clack_db)) * amp(np.interp(s, when, stir_db))
    kick_power = np.bincount(np.round(s * SR).astype(int), kicks ** 2, N)
    stir_t60_s = 0.13  # the stirred heap settles
    stirred = signal.lfilter([1], [1, -amp(-60 / (stir_t60_s * SR)) ** 2], kick_power)
    stream = swells(gushes, rise=0.017, t60=0.5)[0]
    return stream, np.sqrt(stream ** 2 + stirred[:N])


def rim():
    """A piece glances off the rim with a thin bright tick: a very short burst of high noise."""
    # Each row: start in seconds, level in dB.
    snaps = [(6.2831, -19.5), (6.4633, -27.5)]
    bright = [(6000, -46), (9500, 0), (12500, 4), (16000, -0.5)]  # (Hz, dB)
    return place(*np.transpose(snaps), cracks(len(snaps), bright, t60=0.0074, spike=4.2))


def scene():
    """Mix the tub close by and the box a little farther off, in a quiet room."""
    # Colour of the still room. Each row: frequency in Hz, relative level in dB.
    air_colour = [(25, -11.5), (100, -5), (200, -12.5), (700, -15.5), (5000, -31.5), (15000, -46.5)]
    near = landings()
    far = tumbling() + box() + palm()
    # the farther sounds carry more echo; the rim, right by the microphones, has none
    echo = room(amp(-8.5) * near + amp(-4.5) * far, delay=0.0019)
    air = unit(colour(rng.standard_normal((2, N)), air_colour))
    return near + far + rim() + tub_wall(near, t60=0.044) + echo + table() + amp(-57.0) * air


def record(dry):
    """The two microphone ports differ in colour; a steep filter removes the highest treble."""
    # Each row: frequency in Hz, level of left over right in dB.
    left_over_right = [(100, 1.5), (800, 0), (1050, 3.5), (1270, -0.5), (3000, 0.8), (6200, 1),
                       (10000, 2.5)]
    top_hz = 16200
    size = next_fast_len(N + SR // 2)
    hz = np.fft.rfftfreq(size, 1 / SR)
    ports = amp(along(left_over_right, hz) * np.array([[1], [-1]]) / 2)
    band = 1 / (1 + (hz / top_hz) ** 120)
    return irfft(rfft(np.clip(dry, -1, 1), size) * ports * band, size)[:, :N]


dry = scene()
out = record(dry)
wav_record(out)
```